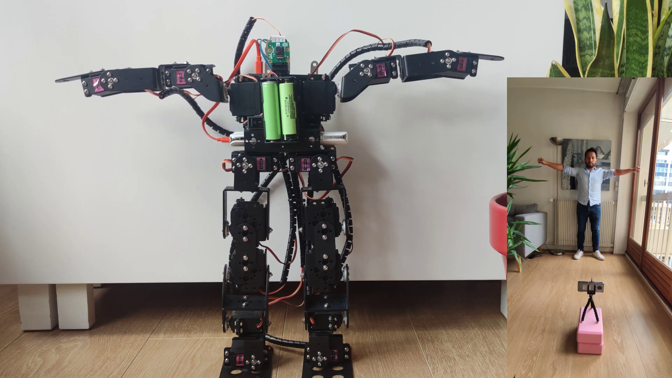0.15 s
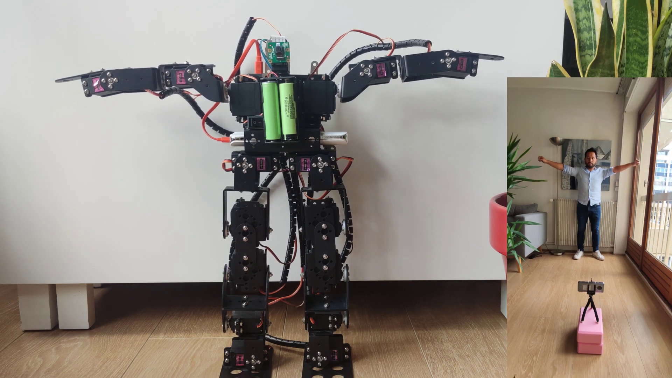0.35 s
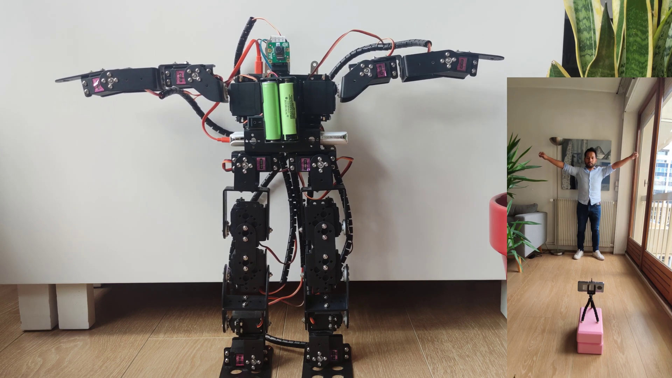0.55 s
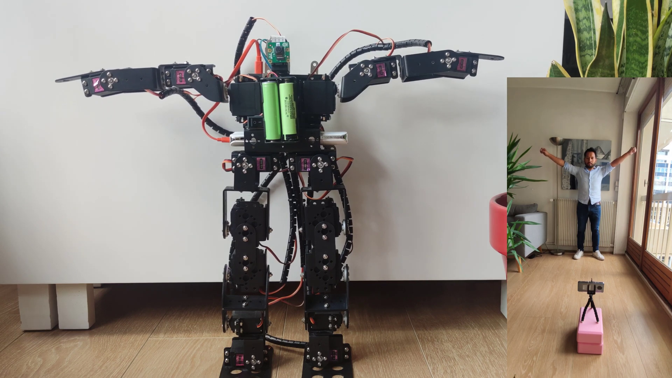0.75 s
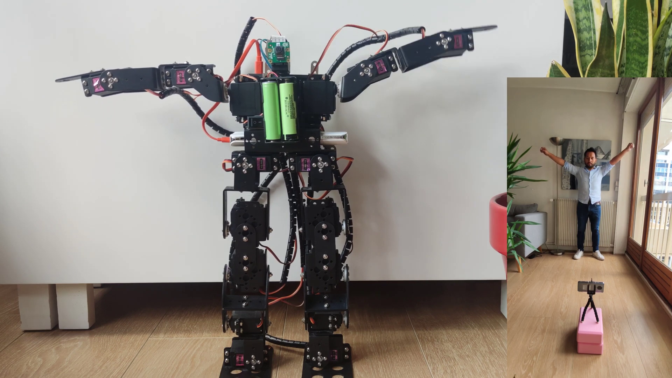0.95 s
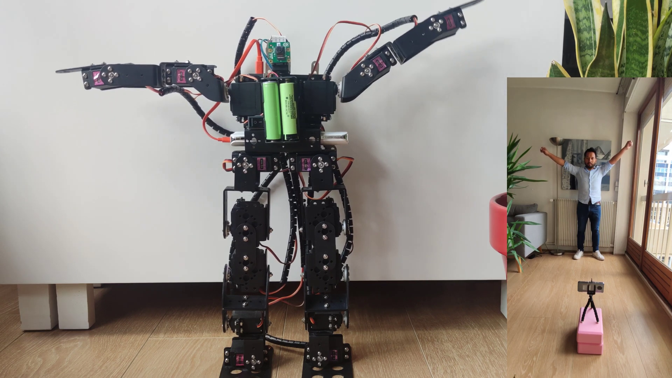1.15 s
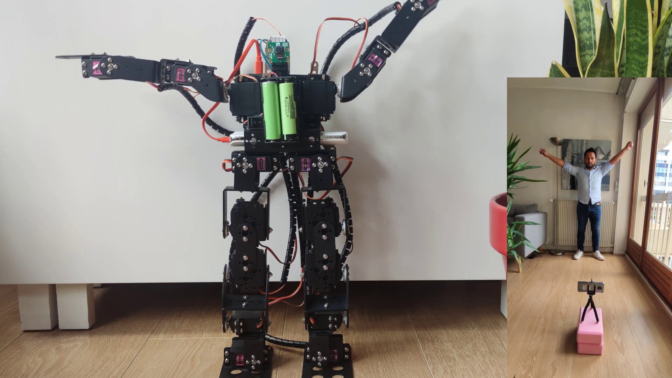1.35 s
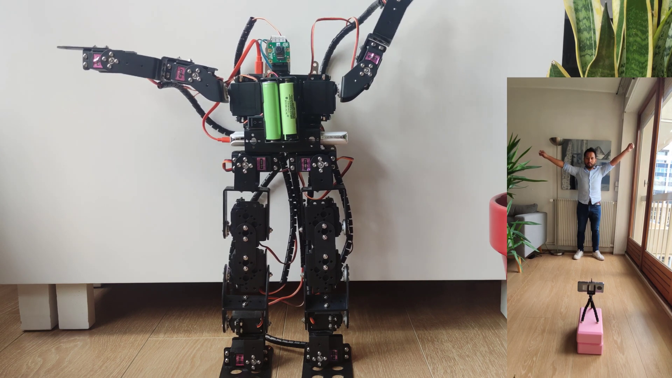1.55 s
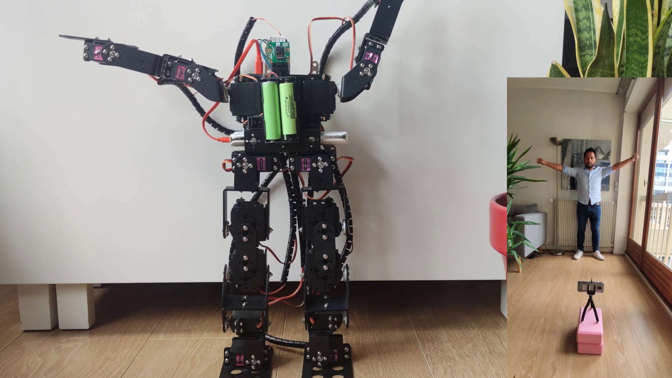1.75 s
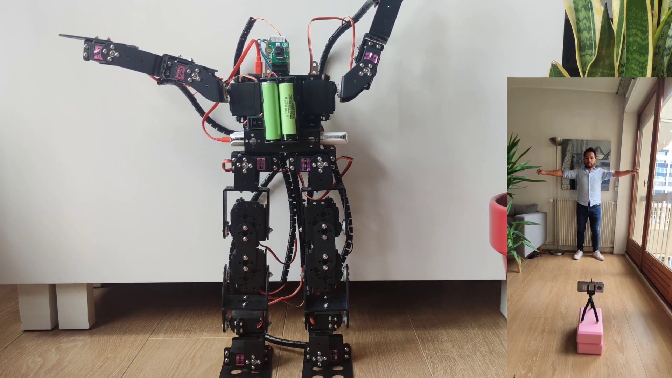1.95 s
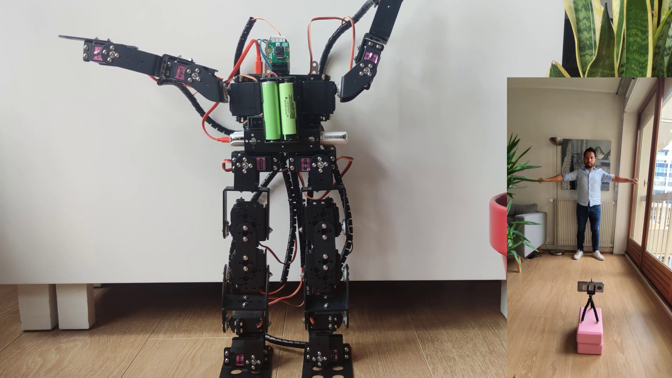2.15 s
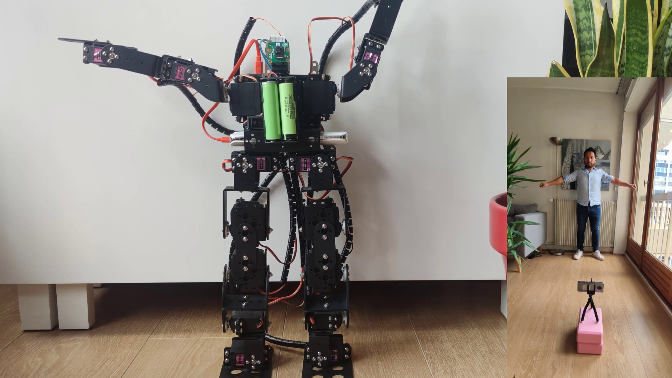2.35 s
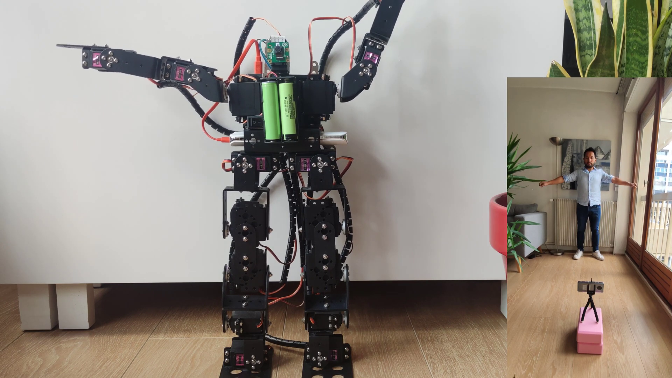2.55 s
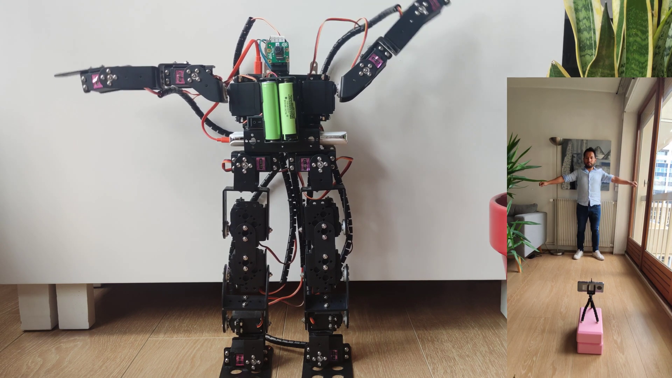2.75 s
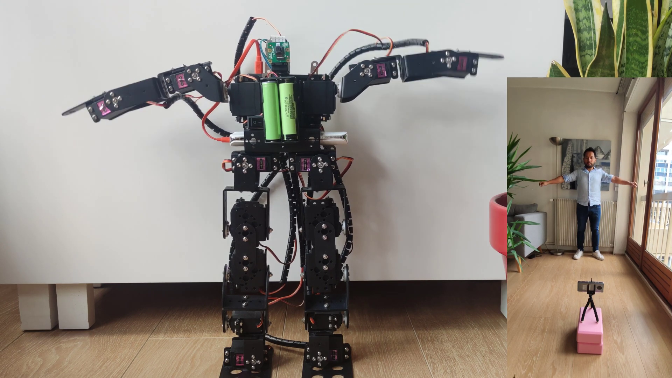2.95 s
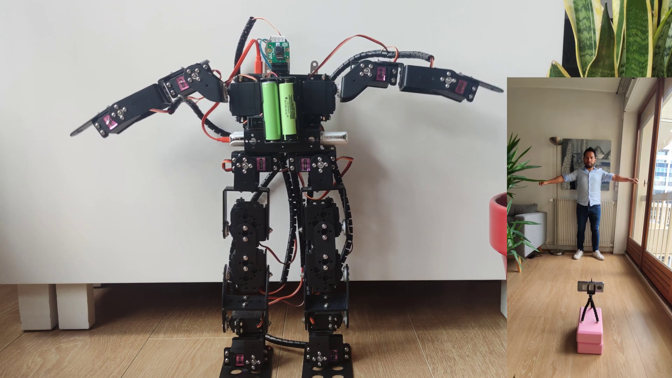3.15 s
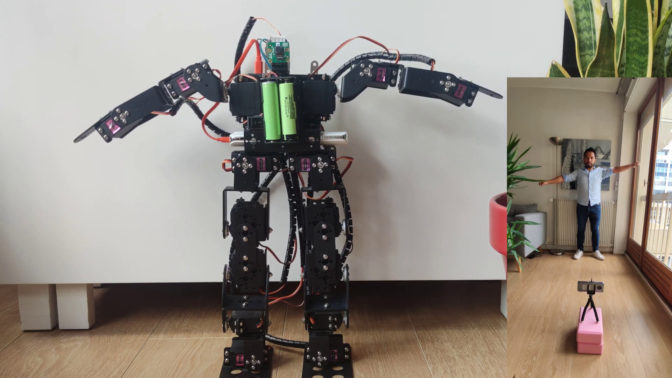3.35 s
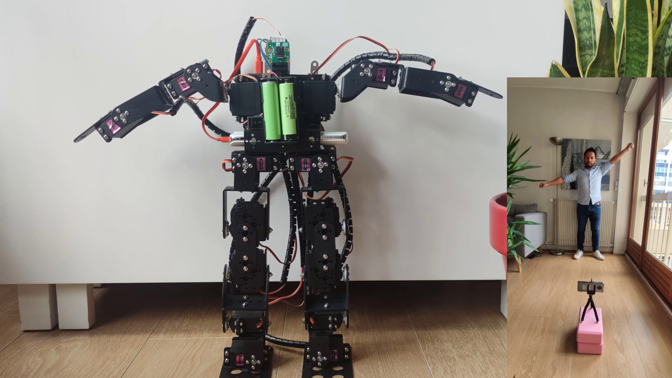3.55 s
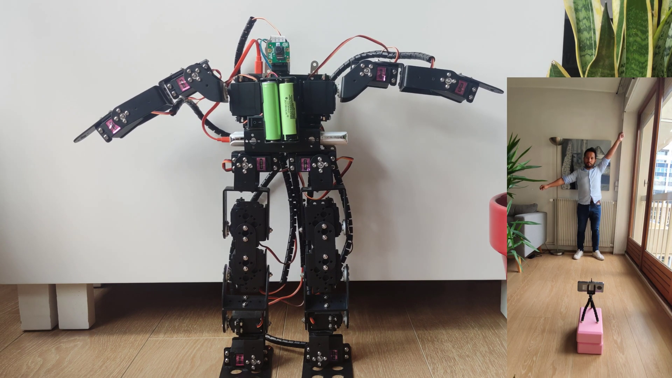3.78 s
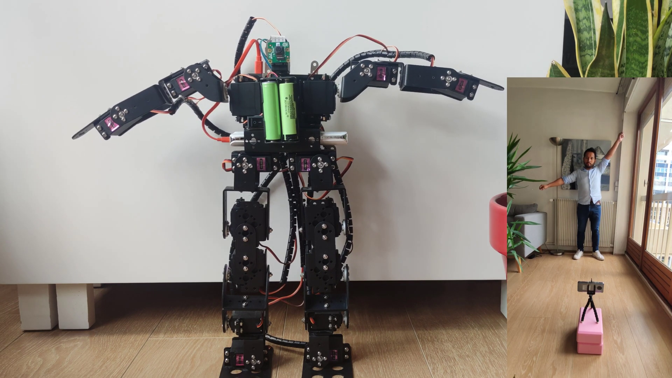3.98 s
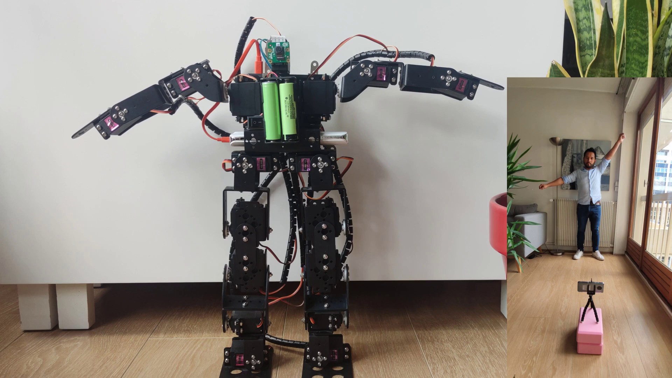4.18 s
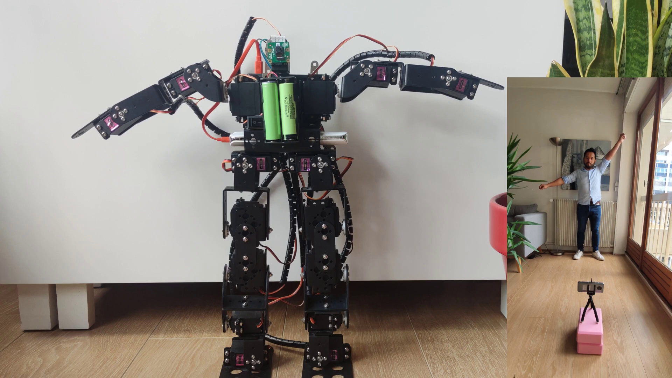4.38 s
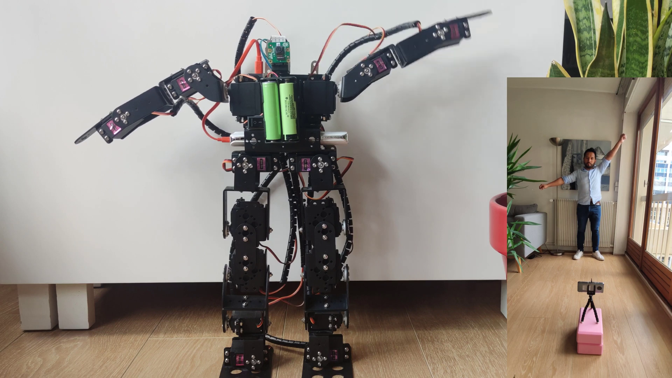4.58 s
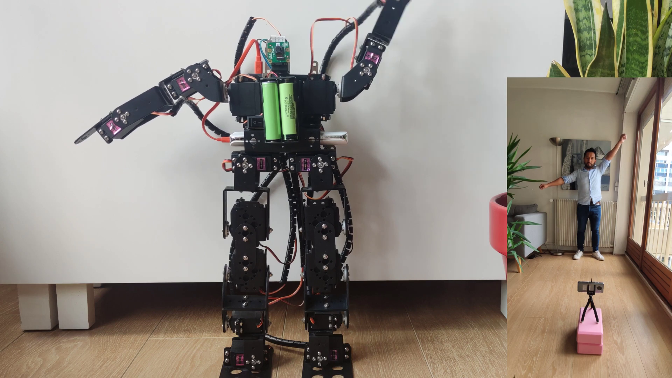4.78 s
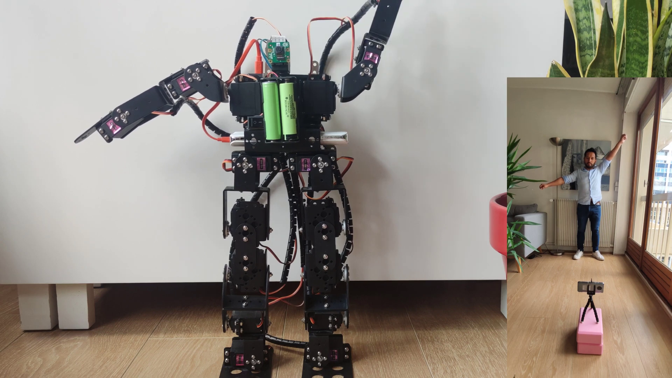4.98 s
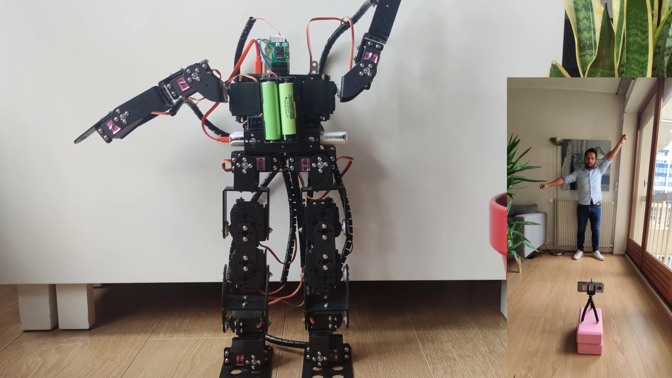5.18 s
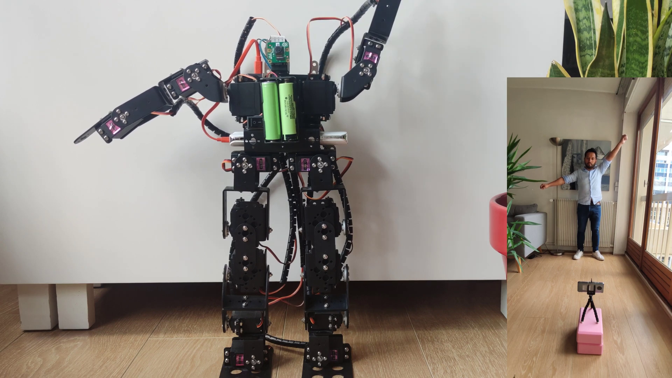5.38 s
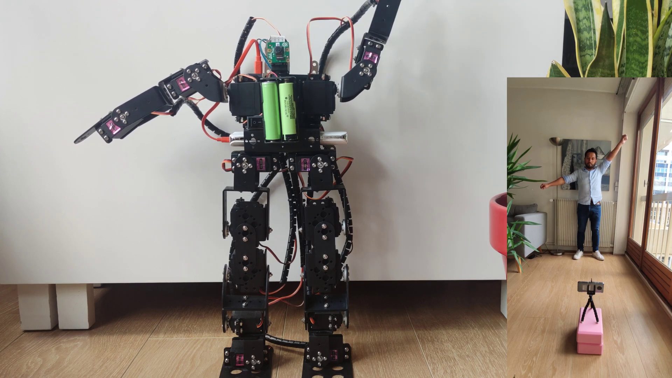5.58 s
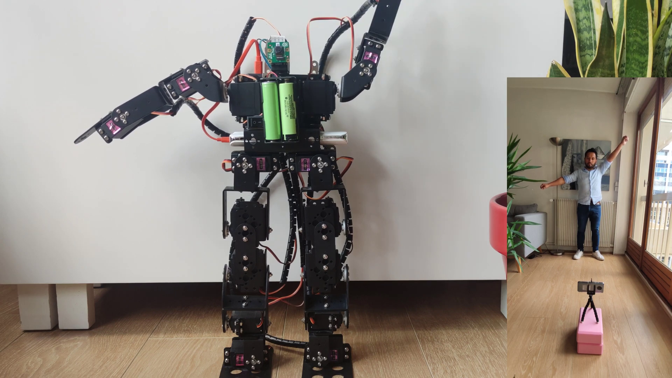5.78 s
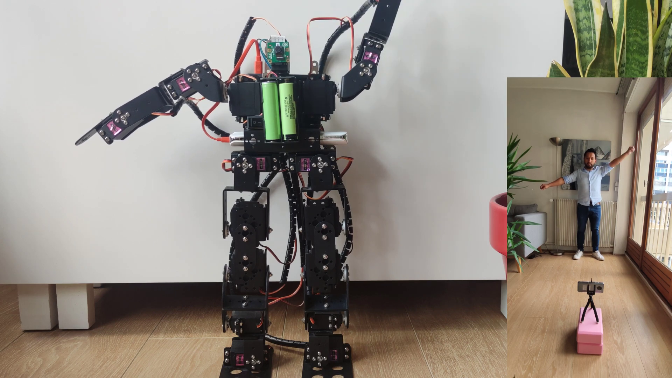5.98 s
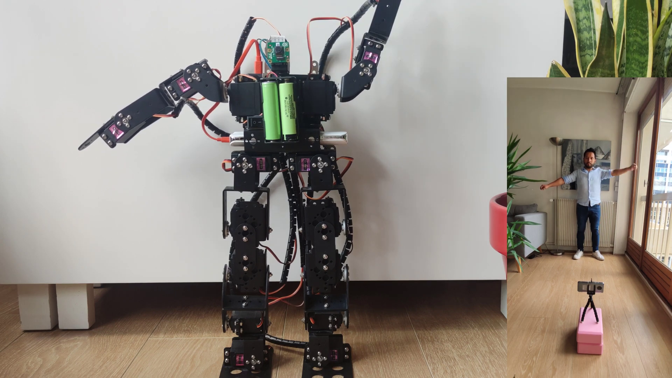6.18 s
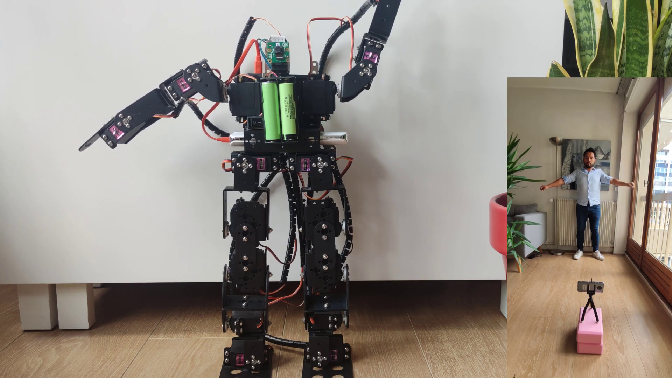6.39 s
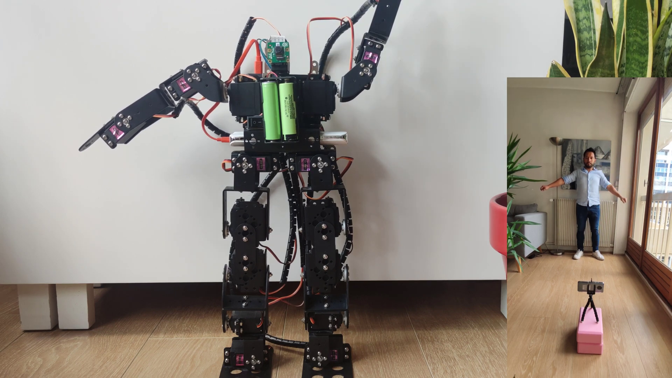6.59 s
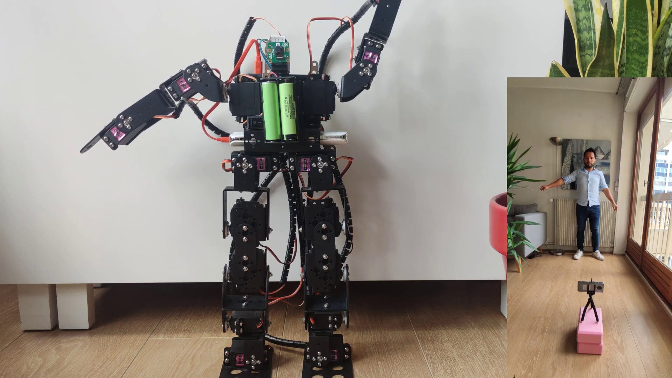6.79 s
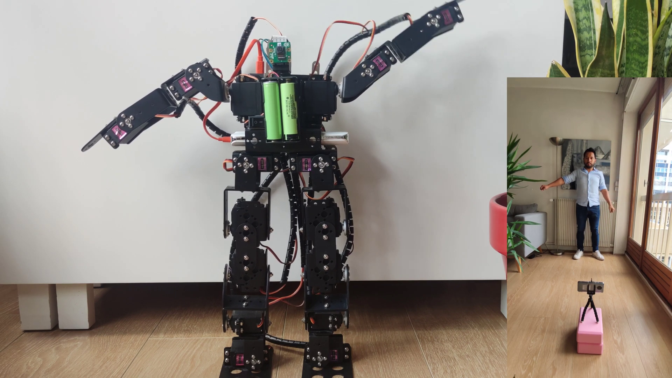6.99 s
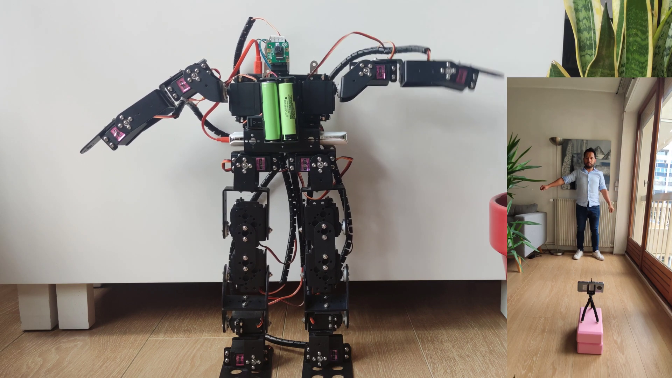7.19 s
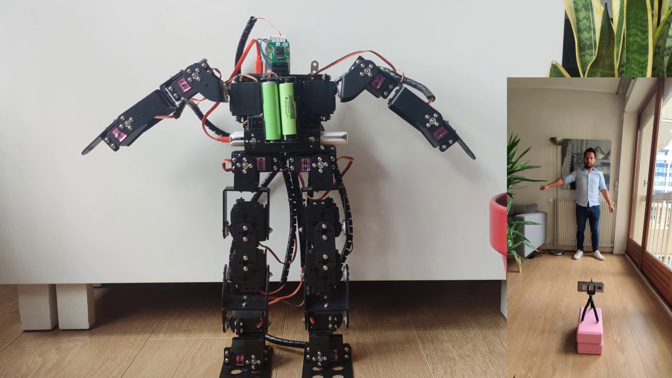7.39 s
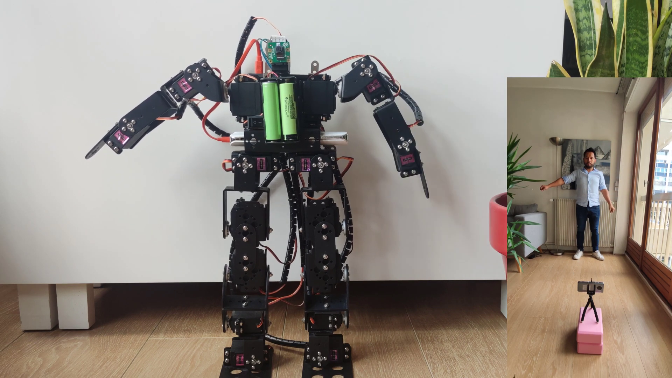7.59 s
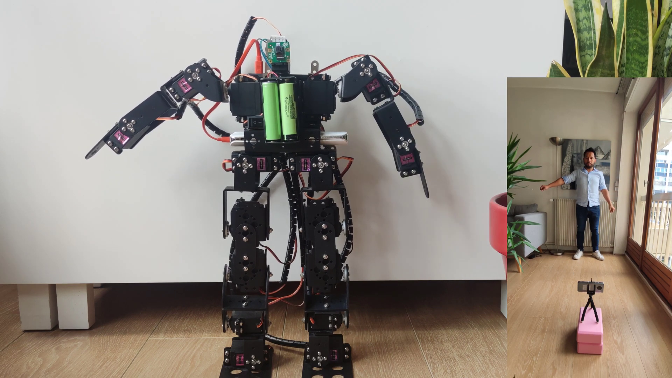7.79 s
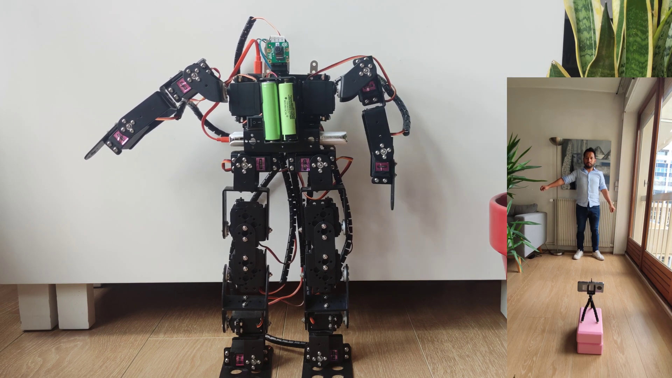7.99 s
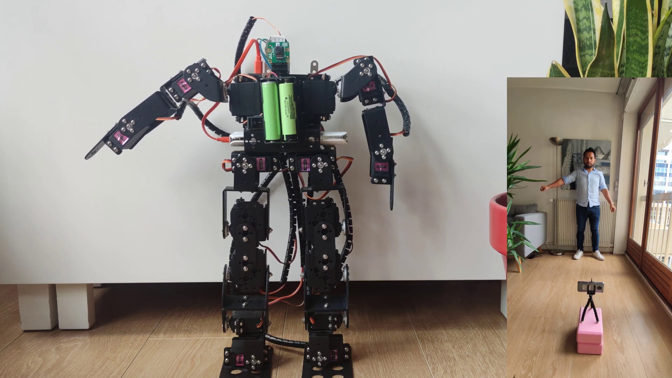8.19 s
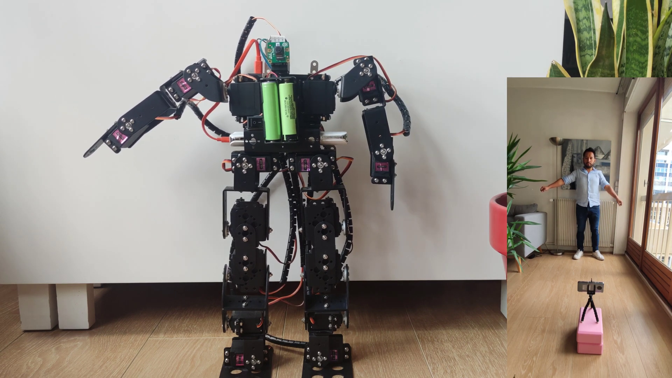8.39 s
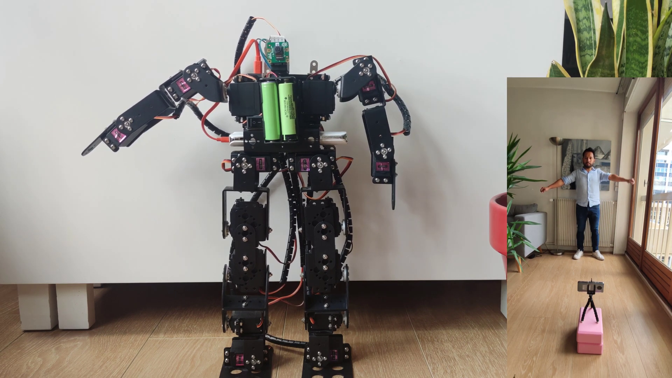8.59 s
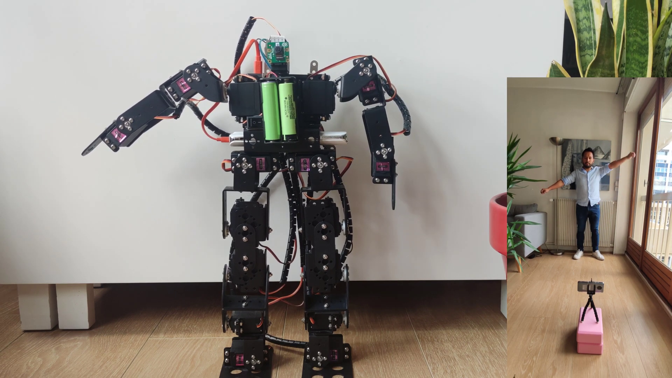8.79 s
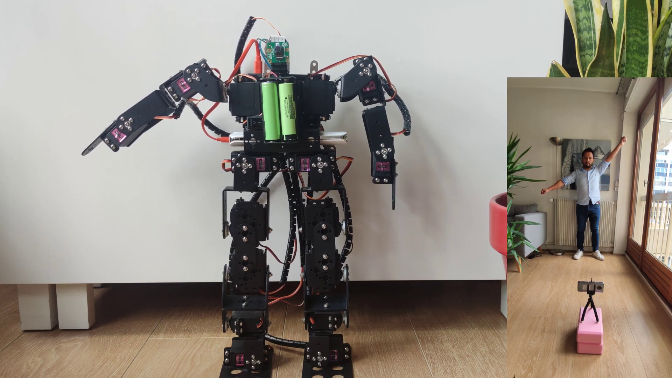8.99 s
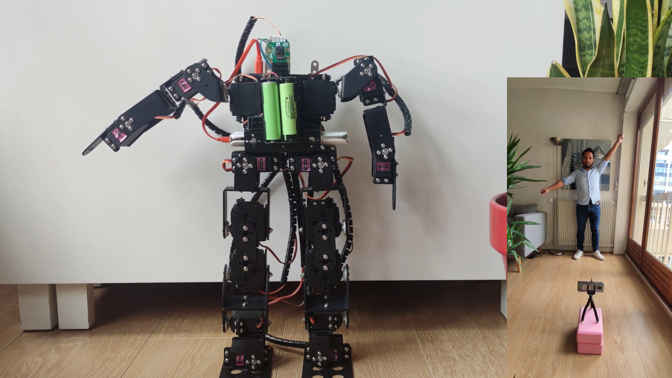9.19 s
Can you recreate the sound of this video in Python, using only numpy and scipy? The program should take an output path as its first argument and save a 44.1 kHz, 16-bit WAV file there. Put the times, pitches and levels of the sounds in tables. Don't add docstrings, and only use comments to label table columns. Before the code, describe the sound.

Stereo close pickup indoors, about a metre away, with short dull reflections. Plastic geared servos make brief gritty zips: several small steps, a hissy grinding cluster, one strong rising whine, then a choppy run of scrapes. Tiny gear clicks lead the moves and soft frame knocks accompany the swings. A faint, high fluttering motor buzz and steady electrical hum fill the gaps.

```python
import sys
import numpy as np
from scipy import signal
from scipy.fft import rfft, irfft
from scipy.io import wavfile
from scipy.ndimage import uniform_filter1d

SR = 44100
rng = np.random.default_rng(int(sys.argv[2]) if len(sys.argv) > 2 else 0)


def dump_mix(stems):
    frames = np.atleast_2d(stems).T
    limited = np.clip(frames, -1, 1)
    pcm = np.round(limited * 32767).astype(np.int16)
    wavfile.write(sys.argv[1], SR, pcm)


def gain_from_db(level_db):
    decades = np.asarray(level_db, float) / 20
    return 10 ** decades


N = 407484
TIME = np.arange(N) / SR
FREQ = np.arange(N // 2 + 1) * SR / N + 1e-3


def level(x, db):
    return x * gain_from_db(db) / np.sqrt(np.mean(x ** 2))


def colour(table):
    hz, db = np.transpose(table)
    return np.interp(np.log(FREQ), np.log(hz), db)


def ring(hz, width_hz):
    return 1 / (1 + 1j * (FREQ ** 2 - hz ** 2) / (FREQ * width_hz))


def ring_bank(table):
    return sum(gain_from_db(db) * ring(hz, width_hz) ** 2 for hz, width_hz, db in table)


def shape(x, gain):
    return irfft(rfft(x) * gain, N)


def walk(rate_hz):
    k = int(SR / rate_hz)
    held = rng.standard_normal(N // 20)[np.arange(N) // k]
    return 1.3 * uniform_filter1d(uniform_filter1d(held, k), k)


def ticks(phase):
    return np.diff(np.floor(phase), prepend=0)


def air():
    # f/Hz, density/dB per Hz
    mid_spectrum = [(12, -24), (24, -5.5), (36, 2), (70, -3), (130, -6), (250, -12), (500, -16), (800, -22),
                    (1500, -25), (2500, -28.5), (4000, -30.5), (8000, -32), (14600, -31), (15900, -32)]
    # f/Hz, level/dB
    side_over_mid = [(60, -5), (110, -11), (200, -4), (380, -4.5), (700, -1.5), (1290, 2), (2380, 1),
                     (4400, 0.5), (8120, -2), (15000, -61)]
    # f/Hz, rms level/dB
    hum_lines = [(229, -76), (298, -79), (411, -82)]
    mid_db = colour(mid_spectrum)
    mid = shape(rng.standard_normal(N), gain_from_db(mid_db))
    side = shape(rng.standard_normal(N), gain_from_db(mid_db + colour(side_over_mid)))
    hum = np.zeros(N)
    for hz, db in hum_lines:
        gain = np.sqrt(2) * gain_from_db(db + 1.5 * walk(2.89))
        hum += gain * np.sin(2 * np.pi * hz * TIME + .5 * walk(3.7))
    return level(np.array([mid + side, mid - side]), -58) + hum


def regulator():
    pulse_hz = 49.258
    # f/Hz, width/Hz, level/dB
    coil_rings = [(1935, 75, .5), (2150, 200, -13), (2935, 130, 0)]
    return level(shape(ticks(TIME * pulse_hz), ring_bank(coil_rings)), -77) * gain_from_db(walk(.7))


def holding_servos():
    pulse_rates_hz = 119, 132, 129.2, 97.4
    # f/Hz, width/Hz, level/dB
    hold_rings = [(4270, 110, -7.5), (5050, 490, -6.5), (6180, 310, -7), (7020, 210, 1), (7540, 134, 5),
                  (8480, 310, -6), (10000, 220, -8.5), (11500, 54, -1)]
    # t/s, level/dB
    buzz_levels = [(0, -71.5), (1.8, -68), (2.5, -74), (3.4, -66.5), (3.7, -68), (4.15, -67.5), (4.25, -76),
                   (4.4, -74), (5.1, -67.5), (5.5, -70.5), (5.9, -68.5), (6.4, -71), (6.8, -69.5),
                   (7.9, -67.5), (8.25, -68.5), (8.75, -72), (9.24, -77)]
    pulses = np.zeros(N)
    for hz in pulse_rates_hz:
        phase = np.cumsum(hz * (1 + .0004 * walk(2.4))) / SR
        pulses += ticks(phase) * gain_from_db(0.77 * walk(13))
    grit = gain_from_db(-3.0) * rng.standard_normal(N) * gain_from_db(2.7 * walk(10))
    buzz = shape(level(pulses, 0) + grit, ring_bank(hold_rings))
    return level(buzz, 0.1) * gain_from_db(np.interp(TIME, *np.transpose(buzz_levels)))


def pushes(rows, coast_db_per_s):
    spin_up_curve = 1.41
    effort, shell = np.full(N, 1e-11), np.full(N, 1e-11)
    for s, rise_s, hold_s, db, shell_db in rows:
        near = slice(max(int((s - .3) * SR), 0), int((s + .6) * SR))
        t = TIME[near] - s
        spin_up = np.clip(1 + t / rise_s, 0, 1) ** spin_up_curve
        coast = gain_from_db(db - coast_db_per_s * np.clip(t - hold_s, 0, 1))
        power = (spin_up * coast) ** 2
        effort[near] += power
        shell[near] += power * gain_from_db(shell_db) ** 2
    return effort, shell


def efforts(rows, sides):
    full_effort_db, knee_db, stall_slope = -40, -9.5, 1.4
    effort, shell = pushes(rows, 237)
    hiss, _ = pushes(rows, 480)
    low_db, top_db, low_slope, top_slope, inertia_s = sides
    main_db, lag = 10 * np.log10(effort), int(inertia_s * SR)

    def under(power, db, slope):
        slow_db = 10 * np.log10(abs(uniform_filter1d(power, lag)) + 1e-11) - full_effort_db
        stalled_db = stall_slope * slow_db + knee_db * (slope - stall_slope)
        return db + full_effort_db - main_db + np.minimum(slope * slow_db, stalled_db)

    shell_db = 10 * np.log10(shell / effort)
    return main_db, under(effort, low_db, low_slope), shell_db, under(hiss, top_db, top_slope)


def whine_runs():
    # t/s at top speed, tooth rate f/Hz, whine over scrape level/dB
    slow_whine = [
        (1.0, 1070, -8),
        (1.22, 920, -6),
        (1.385, 1020, -5),
        (1.6, 860, -6),
    ]
    # t/s, tooth rate f/Hz
    fast_whine = [
        [(4.49, 850), (4.54, 1440), (4.575, 1640), (4.645, 1655), (4.69, 1760), (4.76, 1738), (4.83, 1815),
         (4.855, 1560), (4.89, 1050)],
        [(6.925, 1150), (6.95, 1400), (6.975, 1570)],
    ]
    sag_per_s, round_s, fade_db_per_s, half_s = 5.5, .02, 120, .075
    free_db, top_speed_hz, db_per_octave = (4.5, 0), 1750, 12
    dt = np.linspace(-half_s, half_s, 9)
    off = np.hypot(dt, round_s) - round_s
    runs = []
    for s, hz, db in slow_whine:
        runs.append(np.transpose([s + dt, hz * (1 - sag_per_s * off), db - fade_db_per_s * off]))
    for run, db in zip(fast_whine, free_db):
        runs.append([(s, hz, db + db_per_octave * np.log2(hz / top_speed_hz)) for s, hz in run])
    return runs


def spans(tables, rest):
    rows = []
    for table in tables:
        first, last = table[0], table[-1]
        rows += [(first[0] - .006, *rest(first)), *table, (last[0] + .006, *rest(last))]
    s, *columns = np.transpose(rows)
    return [np.interp(TIME, s, column) for column in columns]


def tooth_whine(tooth_hz, waver, flicker_db, teeth=10):
    # multiple, level/dB
    tooth_orders = [(1, -13), (2, .5), (3, 4), (4, 3.5), (5, -4), (6, -16), (7, -24)]
    phase = np.cumsum(tooth_hz * (1 + waver * walk(250))) / SR
    wobble = 1 + 0.2 * np.cos(2 * np.pi * phase / teeth)
    tones = np.zeros(N)
    for k, db in tooth_orders:
        gain = gain_from_db(db + flicker_db * walk(110))
        tones += gain * np.cos(2 * np.pi * (k * phase + rng.random()))
    return level(tones, 0) * wobble


def gear_trains():
    tooth_hz, whine_db = spans(whine_runs(), lambda row: (row[1], -50))
    singing = tooth_whine(tooth_hz, .006, 2.8) * gain_from_db(whine_db)
    lurching = sum(tooth_whine(hz * gain_from_db(1.4 * walk(30)), .02, 5.) for hz in (900, 1250))
    return singing, singing + gain_from_db(-15) * lurching


def moving_servo(effort, spectrum, whine):
    # f/Hz, width/Hz, level/dB
    housing_rings = [(3710, 150, -3.5), (3840, 310, -4), (5400, 130, 5), (7000, 72, 12), (7440, 420, 5.5),
                     (8100, 620, -5), (8800, 180, 7), (9150, 450, -4), (10570, 1250, 13.5)]
    band_edges_hz = 4400, 6400, 8150, 9300, 12000
    main_db, low_db, shell_db, top_db = effort
    peaks = sum((gain_from_db(db) - 1) * abs(ring(hz, width_hz)) for hz, width_hz, db in housing_rings)
    housing = gain_from_db(colour(spectrum)) * (1 + peaks)
    steps = [1 / (1 + (edge / FREQ) ** 40) for edge in band_edges_hz]
    bands = -np.diff([np.ones_like(FREQ), *steps, np.zeros_like(FREQ)], axis=0)
    scrape = level(rng.standard_normal(N) * gain_from_db(1.4 * walk(700) + 0.9 * walk(170)), 0)
    main_db = main_db + walk(45)
    frame = housing ** .6
    out = shape(whine, frame / np.sqrt(np.mean(frame ** 2))) * gain_from_db(main_db)
    song_db = 10 * np.log10(1 + uniform_filter1d(whine ** 2, size=800))
    main_db, top_db = main_db - song_db, top_db + 1.5 * song_db
    for band, db in zip(bands, (low_db, shell_db, -4.3, -7.5, -4.5, top_db)):
        gain = housing * band / np.sqrt(np.mean((housing * band) ** 2))
        out = out + shape(scrape, gain) * gain_from_db(main_db + db + 1.26 * walk(30))
    return out


def shoulder(whine):
    # t/s at full effort, spin-up/s, hold/s, level/dB, shell ring/dB
    push_rows = [(.17, .06, 0.062, -67.5, -9), (.94, 0.046, .025, -46.5, -2),
                 (1.002, 0.055, 0.0073, -40, -4), (1.1, 0.05, 0.046, -54, -8),
                 (1.21, 0.09, 0.017, -43.5, -4), (1.29, 0.058, .01, -48.5, -5),
                 (1.37, 0.085, .015, -42, -3), (1.43, 0.045, 0.0096, -49.5, 1),
                 (1.56, .04, 0.029, -53, 1.5), (1.62, 0.14, 0.019, -45.5, -4.5),
                 (2.235, 0.079, 0.019, -63.5, -11), (2.575, 0.099, 0.04, -61, -8),
                 (3.75, .06, 0.12, -73, -6), (4.03, .05, 0.039, -68.5, -9), (4.5, .04, .02, -45.5, 1),
                 (4.54, 0.057, 0.06, -35, -4.5), (4.61, 0.14, 0.077, -34, -5.5),
                 (4.75, 0.099, 0.045, -33, -2.5), (4.84, 0.067, .02, -35, -2),
                 (6.23, 0.13, 0.013, -61.5, -15), (8.52, 0.13, 0.014, -63, -8), (8.635, .03, .01, -74, 0)]
    sides = -22.5, -13, 0.3, .7, 0.1
    # f/Hz, density/dB per Hz
    spectrum = [(470, -61), (800, -30.5), (1510, -32), (1970, -22), (2560, -26), (3330, -21.5),
                (4200, -24.5), (5220, -19), (6620, -11.5), (7140, 0), (9640, -1), (10800, 7.5),
                (11900, -16), (14000, -12), (15900, -17.5)]
    return moving_servo(efforts(push_rows, sides), spectrum, whine)


def elbow(whine):
    # t/s at full effort, spin-up/s, hold/s, level/dB, shell ring/dB
    push_rows = [(2.755, 0.06, 0.037, -39.5, -6), (2.84, 0.11, .011, -34.5, -10),
                 (2.895, 0.025, 0.0068, -33, -11.5), (2.97, .05, 0.026, -35.5, -10.5),
                 (3.03, 0.087, 0.0037, -36.5, -5), (3.2, 0.1, 0.017, -39, -8),
                 (6.945, 0.066, .011, -45.5, 0), (6.965, 0.056, 0.0065, -38.5, -11),
                 (7.035, 0.07, 0.0082, -37.5, -13.5), (7.1, 0.044, .021, -45.5, -3.5),
                 (7.17, 0.066, 0.0096, -38, -7), (7.255, 0.14, 0.0073, -34, -12.5),
                 (7.32, 0.032, 0.018, -35.5, -11), (7.37, .04, 0.016, -33, -10),
                 (7.435, 0.044, 0.0037, -34, -9), (7.535, 0.024, .015, -53, 8.5),
                 (7.595, 0.042, 0.032, -35.5, -12.5), (7.68, .04, .011, -47.5, -8.5),
                 (7.975, 0.049, 0.021, -49, 3), (8.03, 0.057, 0.019, -43, -14)]
    sides = -17, -5.5, 0.74, 1.14, 0.086
    # f/Hz, density/dB per Hz
    spectrum = [(470, -76), (800, -29), (1500, -26.5), (1990, -21), (2790, -22), (3170, -15.5), (4790, -14),
                (5290, -13), (6540, -8.5), (7510, 3.5), (8190, -0.5), (10100, -6), (12200, -14.5),
                (13700, -4.5), (15900, -6.5)]
    return moving_servo(efforts(push_rows, sides), spectrum, whine)


def knocks():
    # t/s, peak level/dB, ring f/Hz, cycles to fade
    frame_knocks = [
        (4.621, -47.5, 78.4, 6.9),
        (5.8, -45.5, 40.8, 2.7),
        (7.194, -45, 474, 1.6),
        (7.422, -48, 474, 3.3),
    ]
    # t/s, peak level/dB, f/Hz
    gear_clicks = [
        (0.898, -42, 10100),
        (2.57, -41, 5900),
        (2.6988, -47, 7770),
        (4.4804, -40, 7310),
        (6.8718, -46, 7000),
        (7.942, -46, 5050),
    ]
    hits = [(s, db, hz, cycles / hz) for s, db, hz, cycles in frame_knocks]
    hits += [(s, db, hz, 0.00078) for s, db, hz in gear_clicks]
    out = np.zeros(N)
    for s, db, hz, fade_s in hits:
        t = np.clip(TIME - s, 0, 1)
        out += gain_from_db(db) * np.sin(2 * np.pi * hz * t) * np.exp(-t / fade_s)
    return out


def room(x, wet_db, t60_s=0.3):
    t = TIME[:SR // 2]
    decay = np.exp(-np.log(1000) * t / t60_s) * np.clip(t / 0.00065, 0, 1)
    tail = rng.standard_normal((2, len(t))) * decay
    return signal.fftconvolve(x[None], level(tail, wet_db) / np.sqrt(len(t)), axes=1)[:, :N]


def scene():
    # f/Hz, level/dB
    lean = [(60, -2), (1000, -3), (3000, -2), (4400, 4), (5500, 2.5), (7300, -9), (8500, -3.5),
            (10500, 2.5), (13500, -3)]
    # f/Hz, level/dB
    echo_colour = [(500, 1), (2000, 2), (3500, 4.5), (5500, 4), (8000, -1), (15000, -8.5)]
    singing, mixed = gear_trains()
    robot = shoulder(singing) + elbow(mixed) + holding_servos() + knocks()
    coil = regulator()
    wall = gain_from_db(-1.5) * np.roll(coil, int(.0071 * SR)) * np.array([[1], [-.45]])
    direct = np.array([shape(robot, gain_from_db(sign * colour(lean) / 2)) for sign in (1, -1)])
    echoes = room(shape(robot, gain_from_db(colour(echo_colour))), -7.0)
    return gain_from_db(-3.0) * direct + echoes + coil + wall + air()


def roll_off(x):
    return signal.sosfilt(signal.butter(12, 16090, fs=SR, output="sos"), x)


def record(dry):
    top_hz = 15750
    cut = np.array([shape(channel, FREQ < top_hz) for channel in dry])
    return roll_off(cut)


dry = scene()
out = record(dry)
dump_mix(out)
```